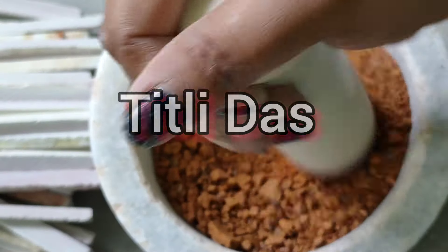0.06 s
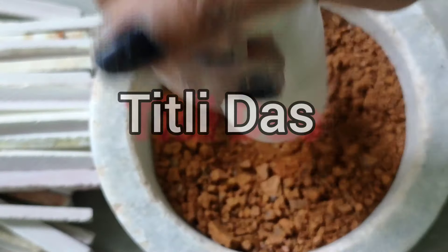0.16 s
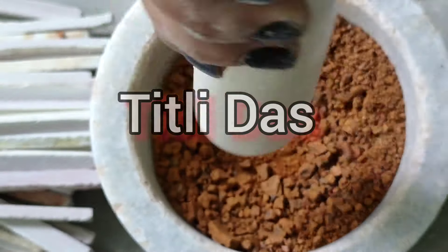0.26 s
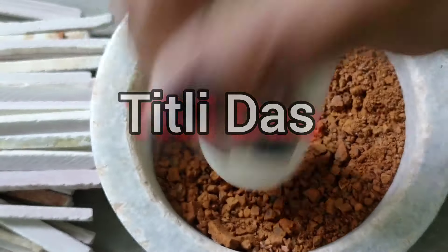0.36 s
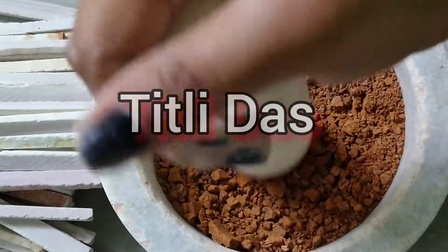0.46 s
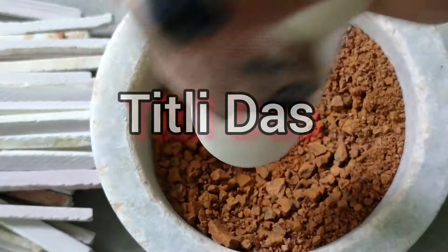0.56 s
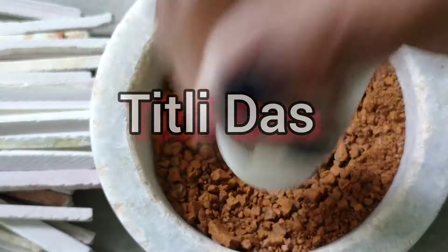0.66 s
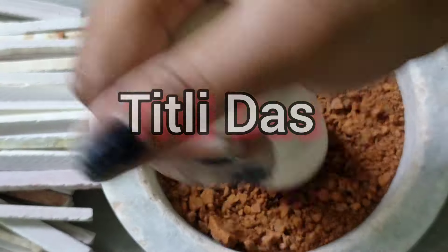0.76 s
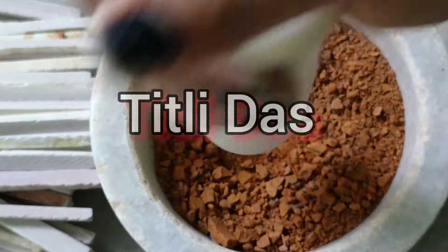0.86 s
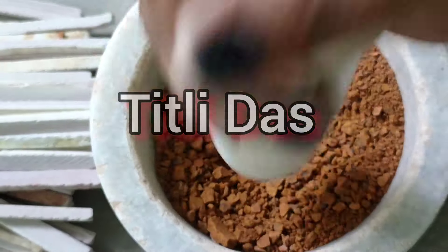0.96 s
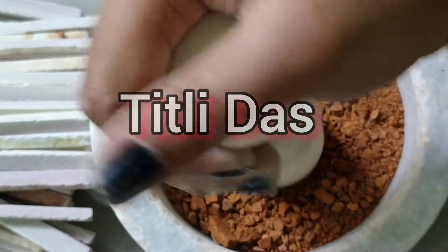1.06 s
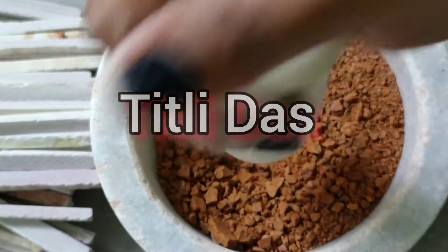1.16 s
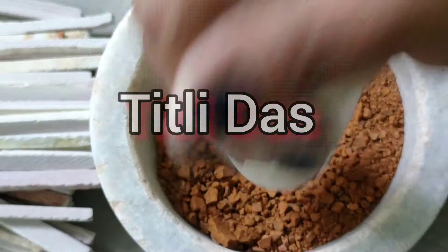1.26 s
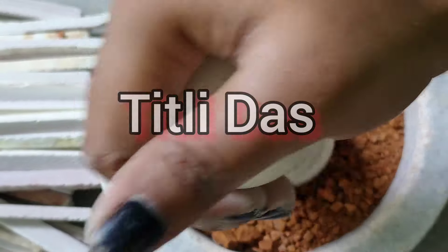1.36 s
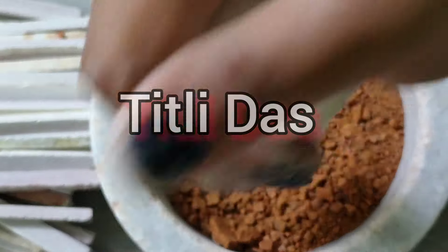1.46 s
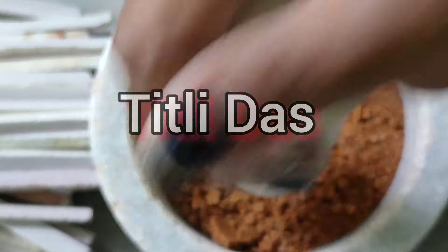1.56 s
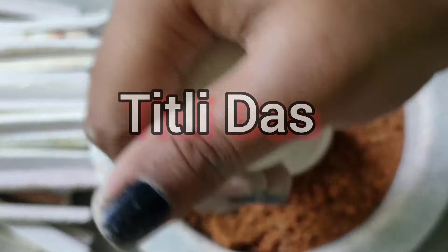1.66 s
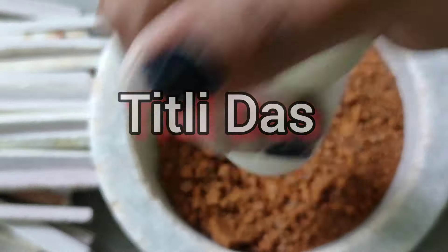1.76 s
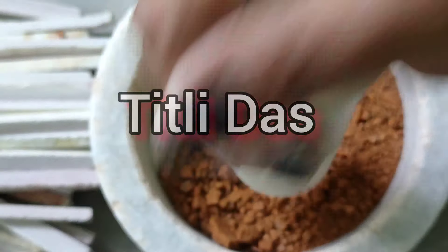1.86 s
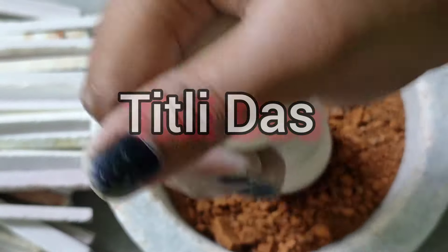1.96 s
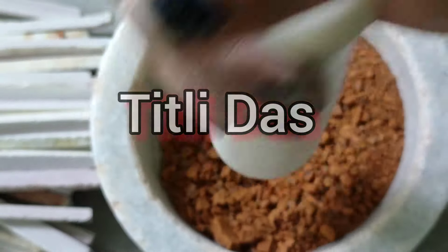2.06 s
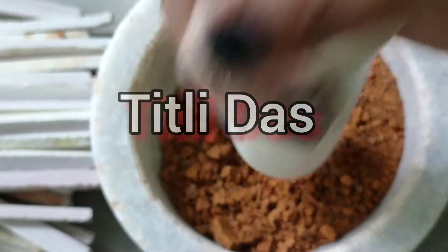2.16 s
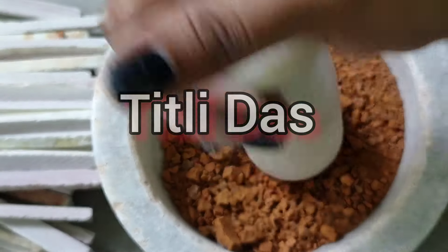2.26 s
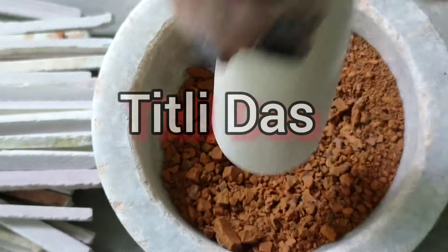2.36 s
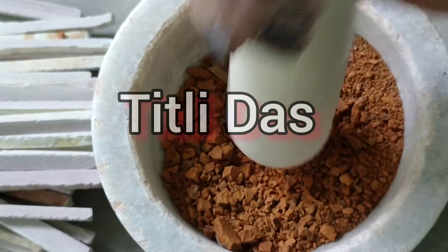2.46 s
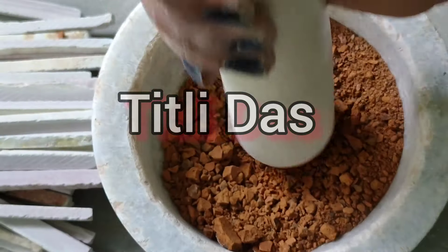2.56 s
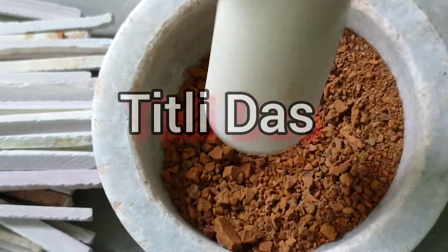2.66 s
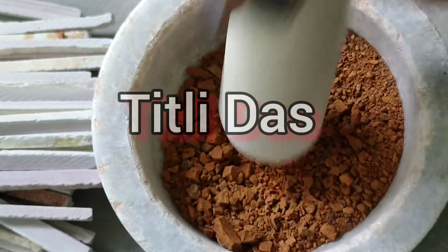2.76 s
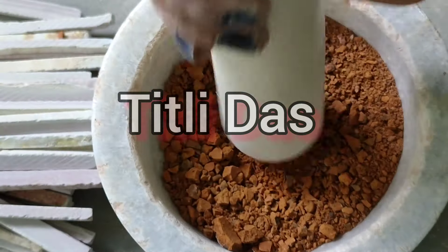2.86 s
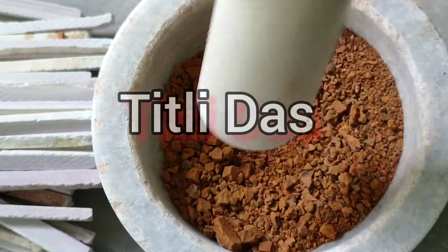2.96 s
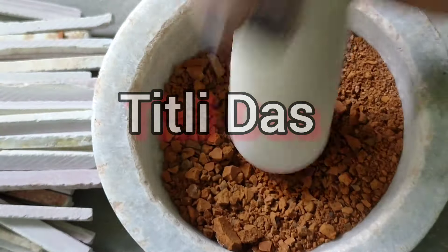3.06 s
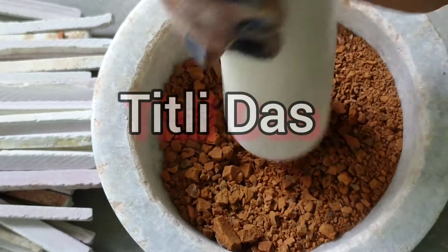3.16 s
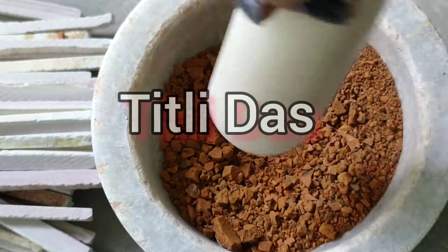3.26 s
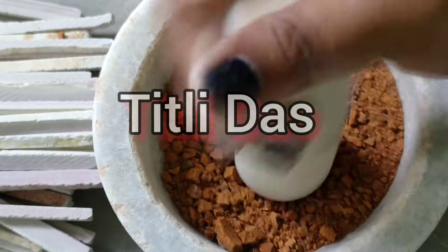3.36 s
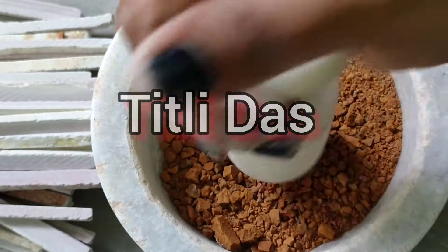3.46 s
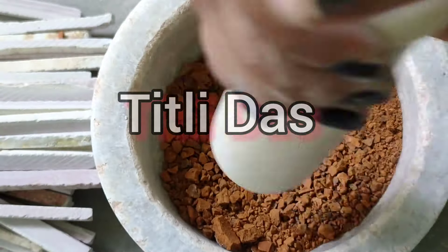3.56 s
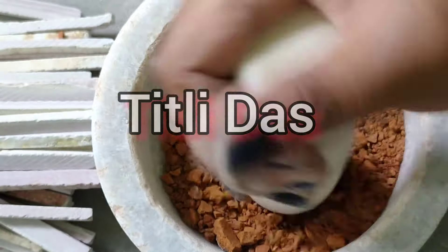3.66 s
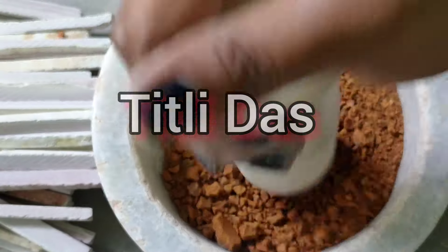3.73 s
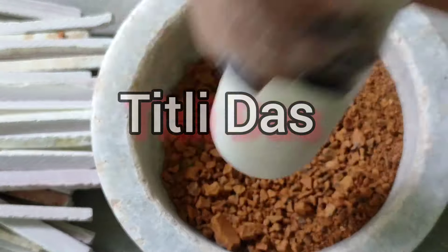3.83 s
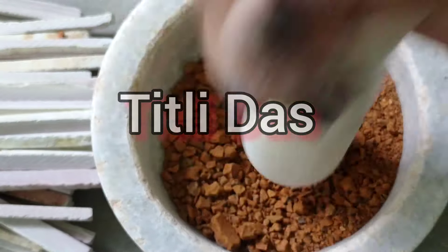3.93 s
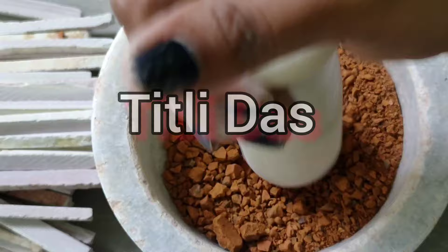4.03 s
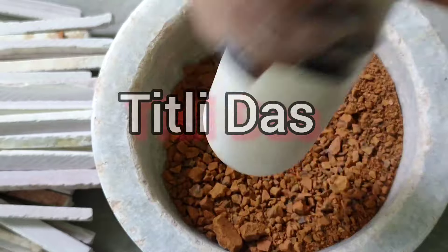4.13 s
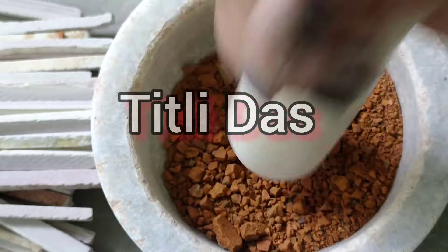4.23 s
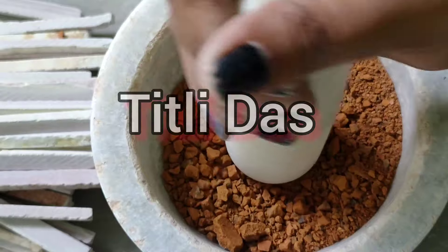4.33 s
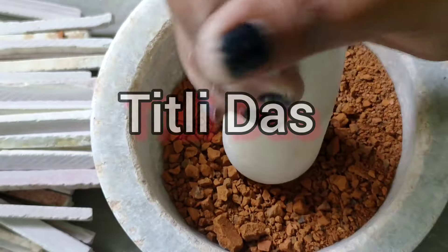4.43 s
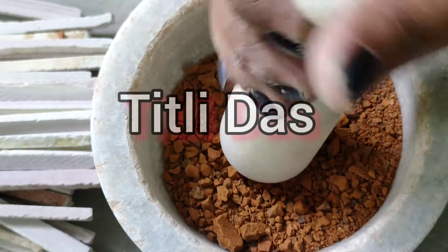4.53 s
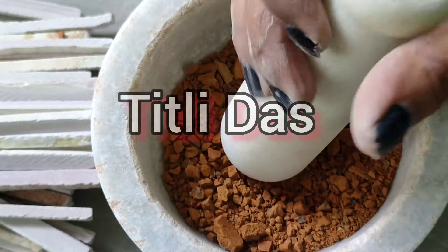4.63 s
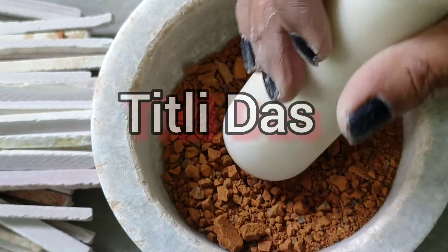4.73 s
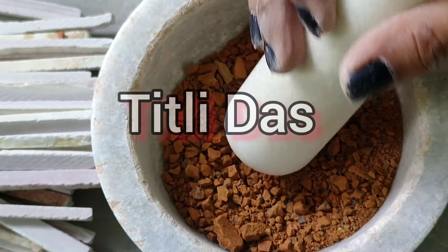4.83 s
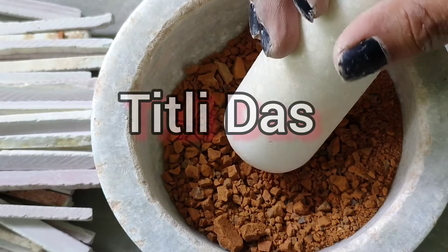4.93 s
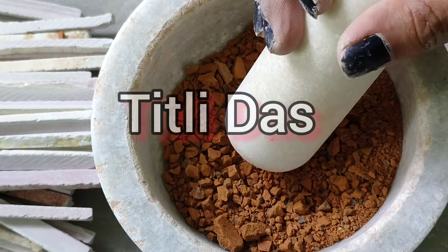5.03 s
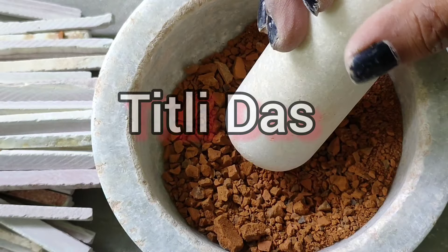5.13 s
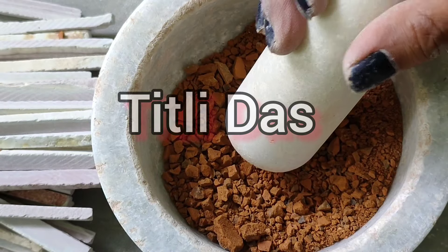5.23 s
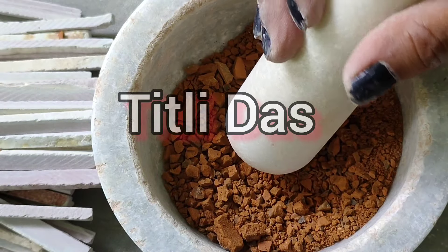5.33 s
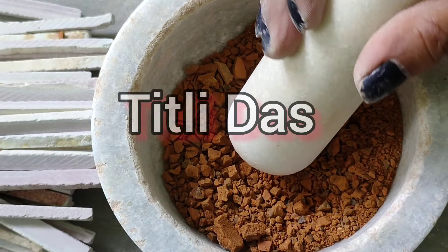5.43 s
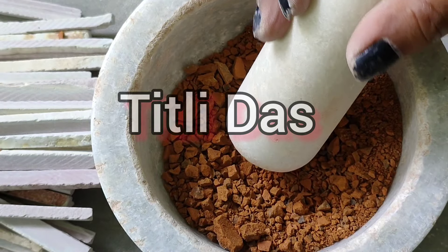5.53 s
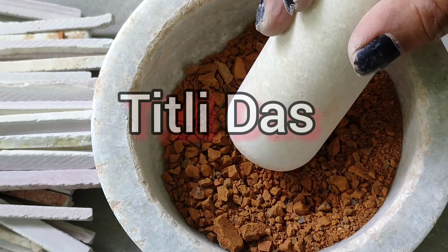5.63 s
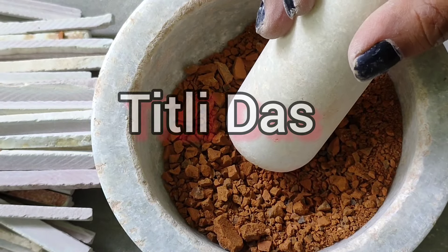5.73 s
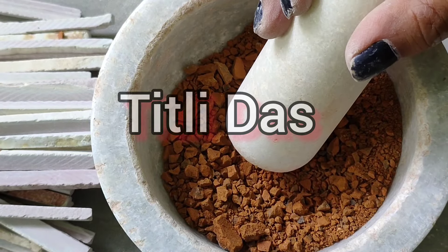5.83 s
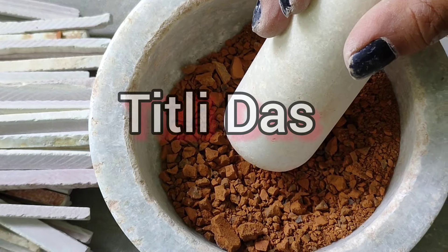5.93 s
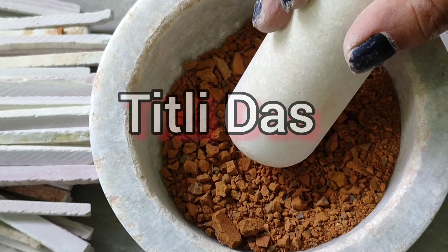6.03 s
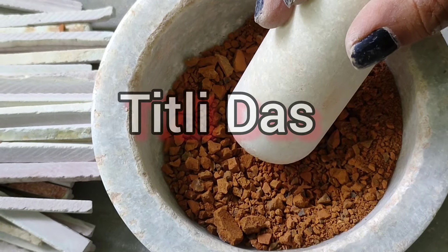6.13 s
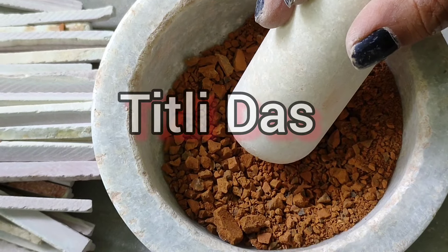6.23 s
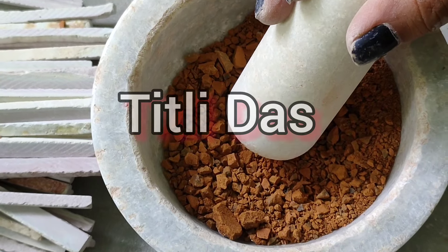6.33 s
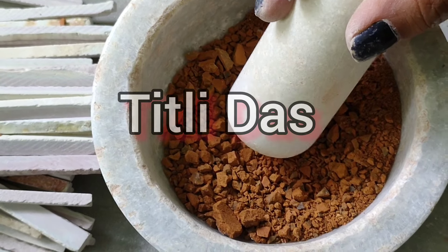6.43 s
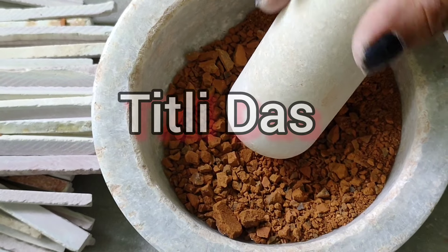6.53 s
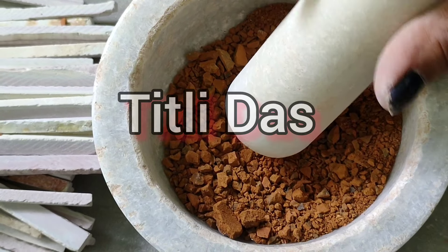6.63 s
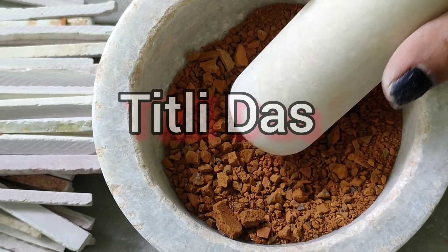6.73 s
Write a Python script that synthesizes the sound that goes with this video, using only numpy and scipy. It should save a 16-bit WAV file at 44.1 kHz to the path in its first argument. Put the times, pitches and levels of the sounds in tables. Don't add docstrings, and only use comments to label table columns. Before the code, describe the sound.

Fourteen sharp, crackling stone knocks crush dry crumbs close up, ringing into a bare room, followed by a brief skin slide and soft wind thumps.

```python
import sys
import numpy as np
from scipy import signal
from scipy.fft import rfft, irfft
from scipy.io import wavfile
from scipy.ndimage import uniform_filter1d

SR = 44100
rng = np.random.default_rng(int(sys.argv[2]) if len(sys.argv) > 2 else 0)


def generate_wav(signal):
    frames = np.transpose(np.atleast_2d(signal))
    scaled = np.clip(frames, -1, 1) * 32767
    pcm = np.round(scaled).astype(np.int16)
    wavfile.write(sys.argv[1], SR, pcm)


def magnitude_from_level(level_db):
    exponent = np.asarray(level_db, float) / 20
    return 10 ** exponent


N = 299439


def along(table, hz):
    f, v = np.transpose(table)
    return np.interp(np.log(np.maximum(hz, 1)), np.log(f), v)


def unit(x):
    return x / np.sqrt(np.mean(x ** 2))


def coloured(table, size=N):
    hz = np.fft.rfftfreq(size, 1 / SR)
    white = rng.standard_normal((2, size))
    return unit(irfft(rfft(white) * magnitude_from_level(along(table, hz)), size))


def band(x, lo_hz, hi_hz, order=2):
    return signal.sosfilt(signal.butter(order, [lo_hz, hi_hz], "bandpass", fs=SR, output="sos"), x)


def fade(t, t60):
    return np.exp(-np.log(1000) * t / t60)


def ring(modes, size, turn=0.):
    t = np.arange(size) / SR
    return sum(magnitude_from_level(db) * np.sin(2 * np.pi * hz * t + turn) * fade(t, t60) for hz, db, t60 in modes)


def sides(pan_db):
    return magnitude_from_level(np.array([pan_db, -pan_db]) / 2).reshape(2, -1)


def ports(pan_db):
    return sides(pan_db) / sides(pan_db).max()


def add(out, s, piece):
    i = max(int(s * SR), 0)
    out[..., i:i + piece.shape[-1]] += piece[..., :N - i]


def walk(rate):
    k = int(SR / rate)
    steps = np.repeat(rng.standard_normal((2, N // k + 1)), k, axis=1)
    return unit(uniform_filter1d(uniform_filter1d(steps, k), k)[:, :N])


def returns(source, walls):
    echo = signal.fftconvolve(source[None], walls[:, :SR // 6], axes=1)[:, SR // 20:SR // 6]
    return source / np.sqrt(np.mean(echo ** 2))


# t/s, weight/dB, crunch/dB, snap/dB
LANDINGS = [(0.335, -43.5, -42.5, -51), (0.6494, -30, -36, -44), (0.9548, -27, -32.5, -38.5),
            (1.2481, -27, -31.5, -41.5), (1.5434, -27, -39.5, -43.5), (1.84, -27, -28.5, -45),
            (2.1363, -27, -42, -40), (2.4311, -31, -38, -46), (2.7276, -29, -32.5, -43),
            (3.0183, -28, -27, -43), (3.3032, -27, -35, -50.5), (3.5896, -29, -33, -40),
            (3.8944, -30.5, -37, -40), (4.1942, -27, -30, -43)]
# low f/Hz, high f/Hz
SEND_BANDS = [(110, 420), (420, 900), (900, 1900), (1900, 3400), (3400, 7700)]
# f/Hz, level/dB, t60/s
TABLE_THUD = [(299, 15.5, 0.011), (496, 11, 0.022), (170, -25.5, .05)]


def pound(near, sent, walls, chance):
    size = chance.shape[-1]
    t = np.arange(size) / SR
    thud = ring(TABLE_THUD, size, turn=np.array([[-.4], [.4]])) * np.clip(t / 0.0023, 0, 1)
    for (s, weight_db, crunch_db, snap_db), bright, noise in zip(LANDINGS, GRIT, chance):
        knock_db = 10 + 1.35 * weight_db
        clink_db = -30.5 + .45 * bright[2]
        add(near, s, -magnitude_from_level(knock_db + 14) * thud)
        shift = band(noise[:2], 500, 2500) * np.exp(-t[::-1] / 0.001)
        add(near, s - size / SR, magnitude_from_level(crunch_db + 9) * shift)
        crush = (t == 0) + 0.089 * noise[2] * np.exp(-t / 0.0022)
        for db, (lo, hi) in zip((weight_db, knock_db, crunch_db, snap_db, clink_db), SEND_BANDS):
            add(sent, s, magnitude_from_level(db - .8) * returns(band(crush, lo, hi, order=3), walls))


# t/s, tick level/dB, pestle ring level/dB, dust level/dB, dust colour f/Hz
GRIT = [(0.335, -32, -57, -60, 13400), (0.649, -20.5, -52, -56, 10800), (0.9561, -30, -50, -68, 11500),
        (1.2482, -26, -58, -66, 13100), (1.5449, -28.5, -55.5, -67.5, 14000),
        (1.8403, -29, -66, -69, 10600), (2.1388, -29, -70, -77.5, 13200),
        (2.43, -20.5, -57.5, -65.5, 14300), (2.7289, -24.5, -62, -76.5, 10800),
        (3.0178, -35, -56.5, -66.5, 13100), (3.3029, -42, -77, -75.5, 9400),
        (3.5907, -21.5, -61, -69, 9400), (3.8942, -30.5, -56.5, -76, 14100),
        (4.1962, -30.5, -60, -74.5, 13700)]
# f/Hz, level/dB, t60/s
PESTLE = [(8070, 7, 0.036), (8067, -9.5, .015)]


def tick(near, sent, walls, chance):
    size = chance.shape[-1]
    t = np.arange(size) / SR
    pestle = ring(PESTLE, size, turn=np.array([[.9], [0]])) * np.clip(t / .0005, 0, 1)
    sheen = band(ring([(7950, 8, .004), (8070, -4, .05)], size), 7300, 8500, order=4)
    for (s, tick_db, ring_db, dust_db, hz), noise in zip(GRIT, chance):
        grit_db = -24.5 + .6 * tick_db
        snap = noise[:2] * np.exp(-t / 0.002)
        add(near, s, magnitude_from_level(tick_db + 5.5) * sides(1.4) * band(snap, 2600, 7500))
        add(near, s, magnitude_from_level(grit_db + 7.5) * sides(6.0) * band(snap, 10500, 15800, order=4))
        add(near, s, magnitude_from_level(ring_db + 21) * sides(-6.0) * pestle)
        chips = noise[2] * np.exp(-t / .0012)
        dust = 1.5 * band(chips, .94 * hz, min(1.06 * hz, 15700))
        dust = dust + .55 * band(chips, 9800, 15600, order=4)
        add(sent, s, magnitude_from_level(dust_db + 4) * returns(dust, walls))
        add(sent, s, magnitude_from_level(ring_db + 4) * returns(sheen, walls))


def blows(walls):
    near, sent = np.zeros((2, N)), np.zeros(N)
    chance = rng.standard_normal((len(LANDINGS), 3, 3000))
    pound(near, sent, walls, chance)
    tick(near, sent, walls, chance)
    return near, sent


# t/s, first level/dB, bowl air f/Hz, gap/ms, second level/dB
CHATTERS = [(0.3347, -18, 1400, 2.4, -15), (0.6505, -6, 1270, 2.4, -5), (0.956, -5, 1320, 3.7, -9),
            (1.2488, -3, 1350, 3.2, -3), (1.545, -9, 1100, 3.7, -7), (1.8424, -5, 1200, 3.2, -8),
            (2.1399, -4, 1200, 2.2, -6), (2.1698, -3, 1280, 3.6, -12), (2.4397, 0, 1310, 3.7, -5),
            (2.7289, 0, 1310, 4.5, -10), (3.0269, -6, 1310, 2.2, -3), (3.3047, -3, 1420, 2.3, -10),
            (3.5913, -13, 1400, 2.8, -5), (3.6666, -4, 1280, 5.1, -10), (3.9423, -6, 1300, 4.4, -14),
            (4.1961, -2, 1360, 8.4, -4)]
# t/s, peak level/dB, bowl air f/Hz
SNAPS = [(0.6844, -10, 1090), (0.7059, -8, 1210), (0.9734, -12, 1250), (0.9839, -7, 1130),
         (1.2793, -8, 1150), (1.2971, -14, 1240), (1.563, -11, 1320), (1.8654, -6, 1290),
         (1.8756, -6, 1180), (2.1562, -14, 1080), (2.4321, -6, 1200), (2.7367, 0, 1310), (3.0193, 0, 1370),
         (3.3275, -11, 1260), (3.338, -5, 1180), (3.3524, -13, 1220), (3.6346, -4, 1210),
         (3.8979, -5, 1230), (3.9347, 0, 1270)]


def cracks():
    out, t = np.zeros((2, N)), np.arange(-200, 400) / SR
    snaps = list(SNAPS)
    for s, first_db, hz, gap_ms, second_db in CHATTERS:
        for k, db in enumerate([first_db, second_db, second_db - 6]):
            snaps.append((s + k * gap_ms / 1000, db, hz * .94 ** k))
    chance = rng.standard_normal((len(snaps), 3))
    for (s, db, hz), (turn, hold, lean) in zip(snaps, chance):
        fall_s = np.array([[.0017], [.0011]]) * np.exp(.15 * hold)
        shape = np.exp(-(t / np.where(t < 0, .0007, fall_s)) ** 2)
        ping = np.sin(2 * np.pi * hz * t + .7 + .4 * turn)
        edge = 0.13 * np.sin(2 * np.pi * 2.0 * hz * t)
        add(out, s + t[0], magnitude_from_level(db) * sides(-1.5 + 2 * lean) * shape * (ping + edge))
    return out


# f/Hz, level/dB per Hz
ECHO = [(60, -45), (110, -22), (190, -12), (340, -7), (430, -9), (520, -5), (800, -14.5), (1400, -13),
        (2500, -28), (3700, -44), (6000, -42), (7900, -43), (9300, -52), (15500, -52), (16100, -98)]
# f/Hz, t60/s
ECHO_T60 = [(100, 0.87), (260, 0.76), (700, 0.8), (1840, 0.49), (4000, 0.25), (6500, 0.42), (8050, 0.55),
            (10000, 0.45), (15000, 0.22)]
# f/Hz, likeness/0-1
ECHO_ALIKE = [(130, .85), (290, 0.82), (640, .72), (1410, 0.4), (3000, .4), (8000, .7)]
# f/Hz, left minus right level/dB
ECHO_LEAN = [(110, 2), (380, 0.5), (1290, .5), (4400, 5.5), (8120, -4), (15000, 2)]
# f/Hz, level/dB, t60/s
TABLE_HUM = [(170.07, -7, 1), (261, -5, .5), (693, -9.5, 0.73)]


def room(size=SR * 3 // 2):
    t, hz = np.arange(size) / SR, np.fft.rfftfreq(size, 1 / SR)
    mid, side = rfft(rng.standard_normal((2, size))) * magnitude_from_level(along(ECHO, hz))
    alike = np.clip(along(ECHO_ALIKE, hz), 0, 1)
    mid, side = mid * np.sqrt(1 + alike), side * np.sqrt(1 - alike)
    both = np.array([mid + side, mid - side]) * sides(along(ECHO_LEAN, hz))
    out = 0
    for centre_hz in 80 * 2 ** np.arange(0, 8, 1 / 3):
        octaves = np.abs(np.log2(np.maximum(hz, 1) / centre_hz))
        share = np.clip(1 - 3 * octaves, 0, 1)
        out = out + irfft(both * share, size) * fade(t, along(ECHO_T60, centre_hz))
    out = unit(out) + magnitude_from_level(11.5) * ring(TABLE_HUM, size)
    return out * np.clip(t / .014, 0, 1) ** 1.3


# f/Hz, level/dB per Hz
SKIN = [(2350, -49.5), (4000, -4), (4260, -33), (4350, -47), (5190, -6), (6970, 0), (9000, -8.5),
        (15500, -9.5)]
# full from t/s, hold/s, level/dB, left minus right level/dB
SLIDES = [
    (4.59, .07, -55.5, 1),
    (5.095, .01, -68, 12),
]
# t/s, peak level/dB, f/Hz, left minus right level/dB
TAPS = [
    (6.4557, -62.5, 6600, -7),
    (6.54, -78, 4030, 12),
    (6.75, -70, 5780, -1),
]


def hand():
    out, t = np.zeros((2, N)), np.arange(N) / SR
    hiss = band(coloured(SKIN), 4300, 15400, order=8) * magnitude_from_level(2.0 * walk(60) + 1.5)
    for s, hold_s, db, pan_db in SLIDES:
        rise_db = 300 * np.maximum(s - t, 0)
        fall_db = 240 * np.maximum(t - s - hold_s, 0)
        out += magnitude_from_level(db - rise_db - fall_db) * sides(pan_db) * hiss
    for s, db, hz, pan_db in TAPS:
        modes = [(hz, 0, .05), (1.1 * hz, -2, .04), (1.6 * hz, -6, .03), (0.21 * hz, -4, .02)]
        add(out, s, magnitude_from_level(db) * sides(pan_db) * ring(modes, size=3000))
    return out


# f/Hz, level/dB per Hz
GUST = [(20, -17), (45, -2), (90, 1), (140, 0), (220, -13), (330, -30), (500, -77.5)]
# t/s, peak level/dB, time to fade 10 dB/s, left minus right level/dB
GUSTS = [(0, -36.5, .11, -8), (.4, -37, .08, -10), (.68, -43, .14, -2), (.97, -37.5, .12, -11),
         (1.2, -36, .14, -5), (1.5, -41, .2, -10), (1.88, -36, .25, -4), (2.19, -28, .1, -12),
         (2.44, -36, .18, -4), (2.7, -25, .05, -10), (2.91, -27, .07, -20), (3.08, -36, .18, -3),
         (3.43, -32.5, .1, 15), (3.62, -29, .11, -8), (4.12, -30, .08, -11), (4.36, -38, .15, 4),
         (4.58, -36.5, .08, -4), (4.9, -37, .18, -8), (5.09, -42, .1, 15), (5.29, -39, .07, 14),
         (5.53, -39.5, .09, -25), (5.75, -33, .06, -35), (6.09, -40, .09, -28), (6.24, -31.5, .09, -33),
         (6.45, -28.5, .07, 3), (6.6, -32, .08, 20)]
# t/s, peak level/dB, f/Hz, left minus right level/dB
PUFFS = [
    (2.701, -16.5, 108, -7),
    (2.907, -27, 87, -15),
    (4.819, -28.5, 76, -20),
    (5.569, -29.5, 99.6, -31.5),
    (5.732, -25.5, 101.9, -35.0),
    (6.236, -30, 62.2, -31.0),
    (6.397, -29.5, 110, 13),
    (6.442, -19, 119.9, 18),
    (6.586, -17.5, 114, 17),
]


def draught():
    t = np.arange(N) / SR
    lumps = unit(coloured(GUST) * magnitude_from_level(1.3 * walk(22)))
    power = magnitude_from_level(2 * -56) / 2
    for s, db, fade_s, pan_db in GUSTS:
        left = 1 / (1 + magnitude_from_level(-2 * pan_db))
        swell = magnitude_from_level(2 * (db - 10 * np.abs(t - s) / fade_s))
        power = power + np.array([[left], [1 - left]]) * swell
    out = 2 * np.sqrt(power) * lumps
    t = np.arange(-1500, 1500) / SR
    for s, db, hz, pan_db in PUFFS:
        thump = -np.sin(2 * np.pi * hz * t) * np.exp(-(t * hz / .5) ** 2)
        add(out, s - .023, 2 * magnitude_from_level(db) * ports(pan_db) * thump)
    return out


# f/Hz, level/dB per Hz
FLOOR = [(120, -29), (200, -13.5), (354, -14), (420, -7), (554, -8.5), (981, -14.5), (1090, -14),
         (2550, -24), (3990, -39), (6450, -38), (8000, -48), (10400, -83), (17600, -120)]
# t/s, peak level/dB, f/Hz, left minus right level/dB
KNOCKS = [(0.023, -42.5, 604, 8), (0.167, -46, 1317, 22), (4.742, -41, 529, -20), (5.291, -45, 990, -16),
          (5.644, -53, 439, -4), (5.812, -44.5, 706, -19), (5.882, -54, 493, 2), (6.183, -42.5, 504, 4),
          (6.446, -42.5, 369, 19), (6.498, -52.5, 408, -2), (6.561, -58, 354, 3), (6.596, -44.5, 467, 5.5),
          (6.67, -49, 447, -19), (6.722, -48.5, 451, -11)]


def household():
    out, t = magnitude_from_level(-60.5 + 0.63 * walk(5)) * coloured(FLOOR), np.arange(5000) / SR
    when, pitch, size, side = rng.random((45, 4)).T
    faint_db = -60 - 9 * pitch - 5 * size
    faint = np.transpose([when * N / SR, faint_db, 450 * 7.0 ** pitch, 40 * (side - .5)])
    for s, db, hz, pan_db in [*KNOCKS, *faint]:
        knock = np.clip(t / 0.0033, 0, 1) * ring([(hz, 0, .15)], len(t))
        add(out, s, magnitude_from_level(db) * ports(pan_db) * knock)
    return out


def scene():
    walls, snaps = room(), cracks()
    near, sent = blows(walls)
    crackle = snaps[1] + magnitude_from_level(18) * band(snaps[1], 2000, 4200, order=4)
    sent = sent + magnitude_from_level(-63) * crackle
    echo = signal.fftconvolve(sent[None], walls, axes=1)[:, :N]
    return near + snaps + echo + hand() + draught() + household()


def band_limit(x):
    return signal.sosfilt(signal.butter(12, 16820, fs=SR, output="sos"), x)


def record(dry):
    heard = signal.sosfilt(signal.butter(2, 45, "highpass", fs=SR, output="sos"), dry)
    heard = signal.sosfilt(signal.ellip(8, .2, 20, 15600, fs=SR, output="sos"), heard)
    heard[0] = np.roll(heard[0], 2)
    full = np.clip(heard, -1, 1)
    return band_limit(full)


dry = scene()
out = record(dry)
generate_wav(out)
```